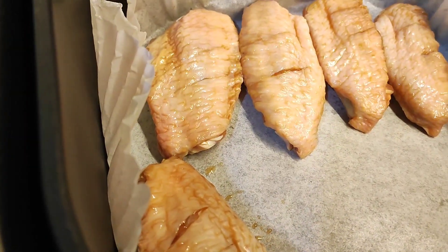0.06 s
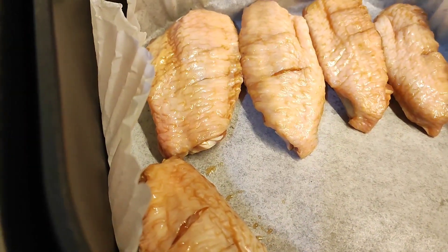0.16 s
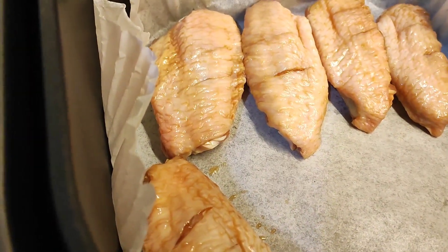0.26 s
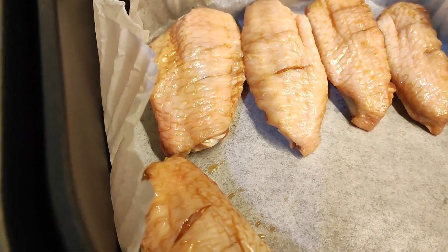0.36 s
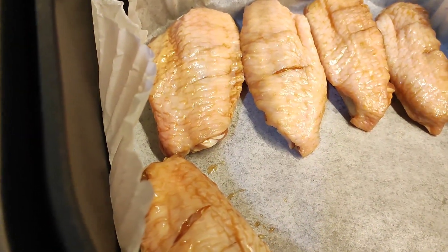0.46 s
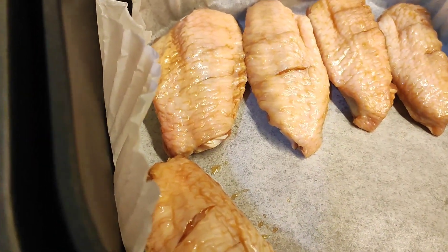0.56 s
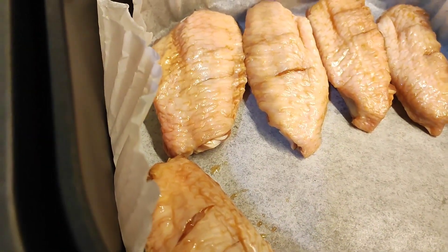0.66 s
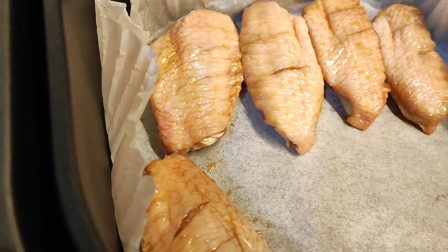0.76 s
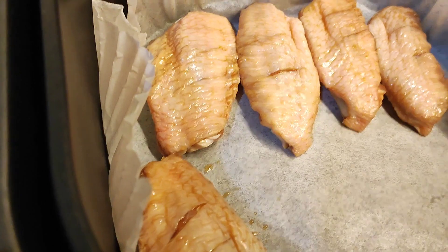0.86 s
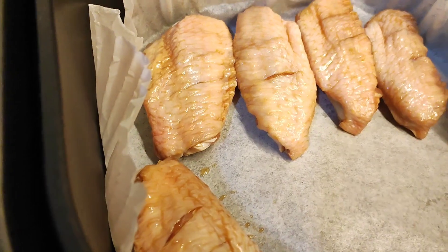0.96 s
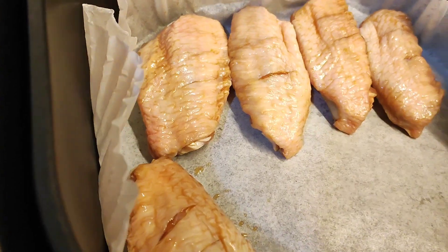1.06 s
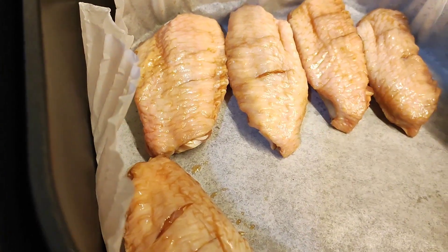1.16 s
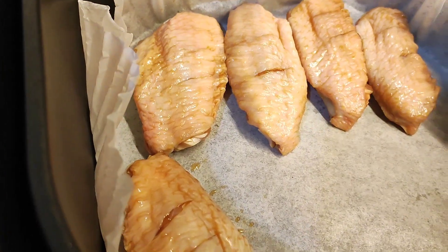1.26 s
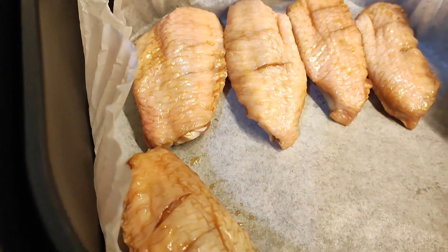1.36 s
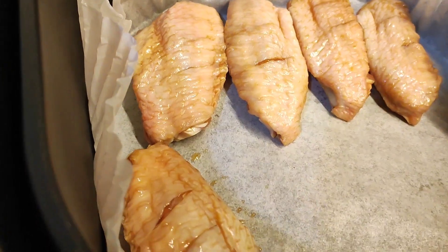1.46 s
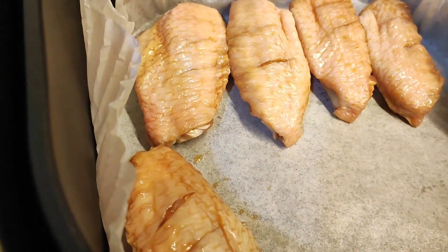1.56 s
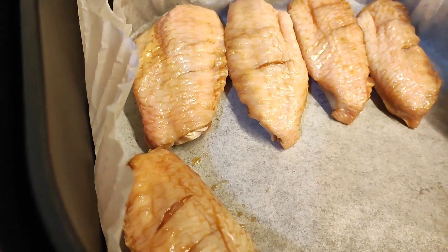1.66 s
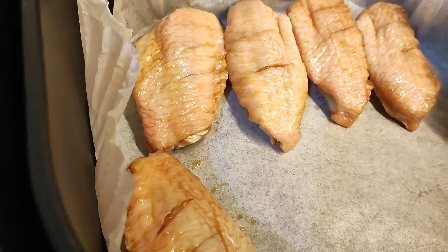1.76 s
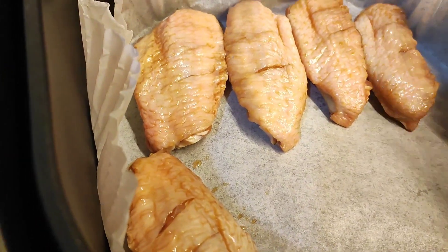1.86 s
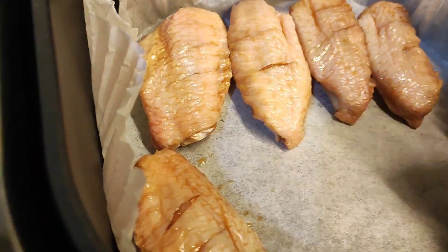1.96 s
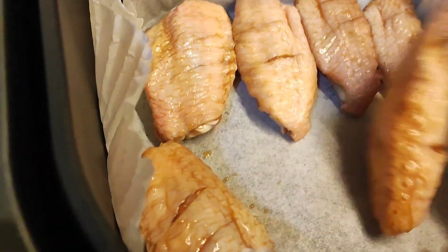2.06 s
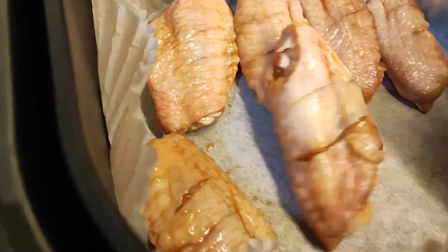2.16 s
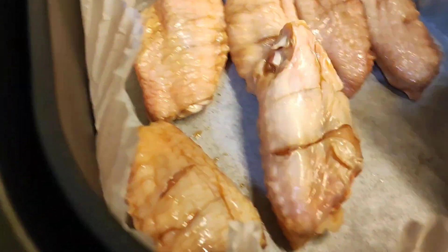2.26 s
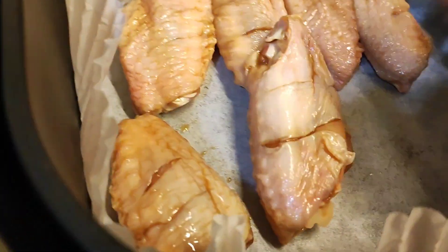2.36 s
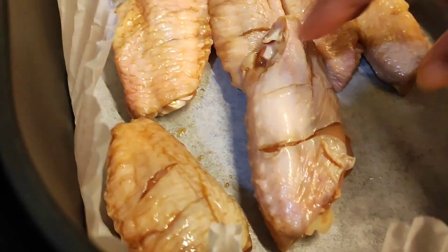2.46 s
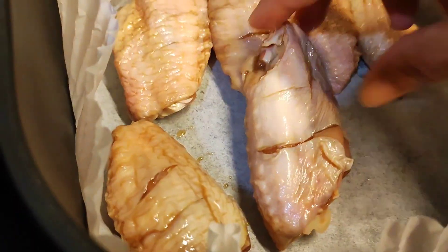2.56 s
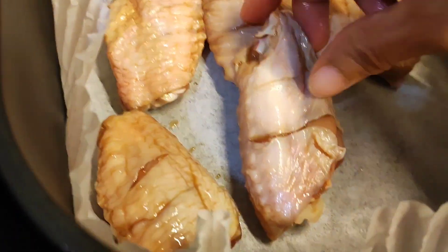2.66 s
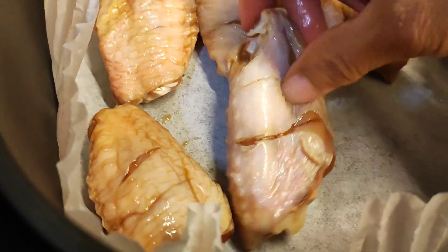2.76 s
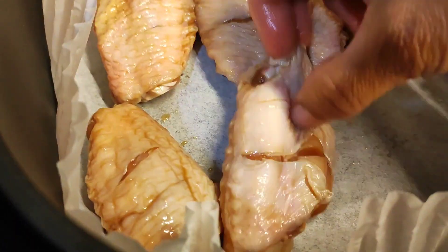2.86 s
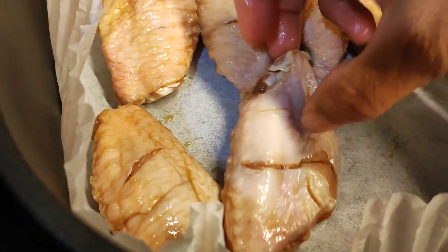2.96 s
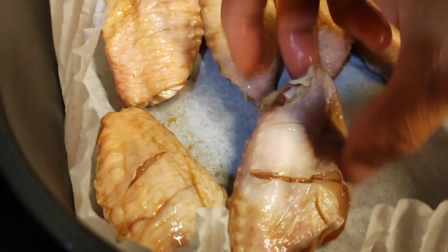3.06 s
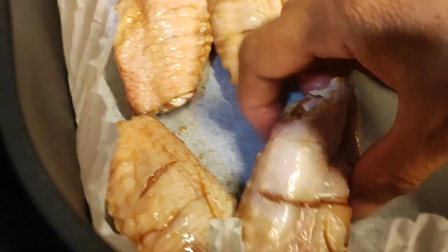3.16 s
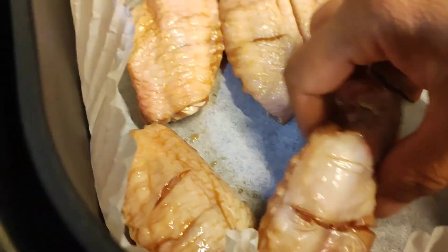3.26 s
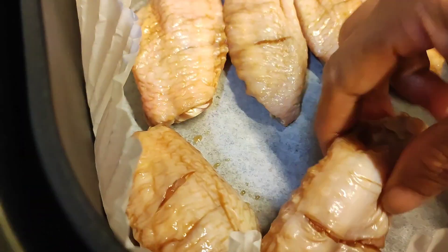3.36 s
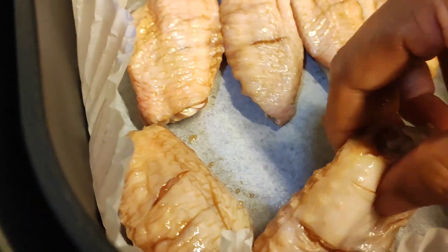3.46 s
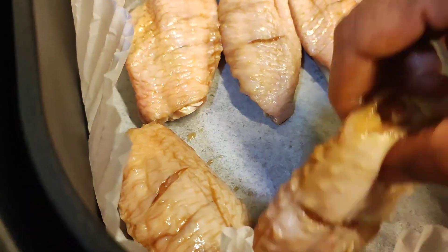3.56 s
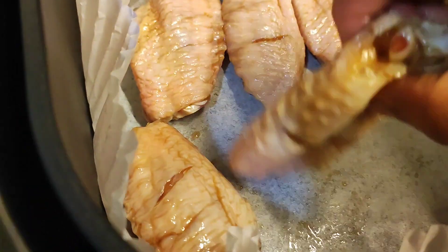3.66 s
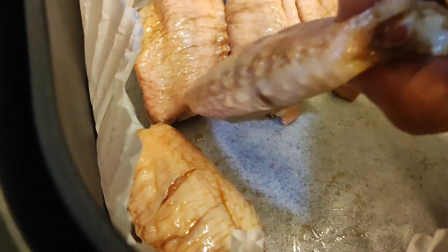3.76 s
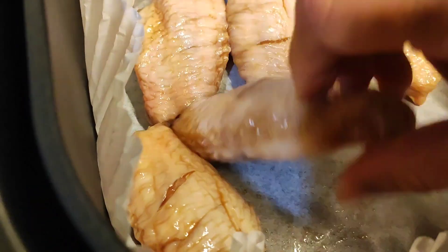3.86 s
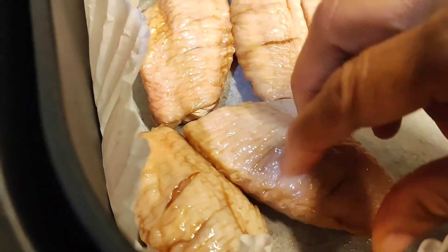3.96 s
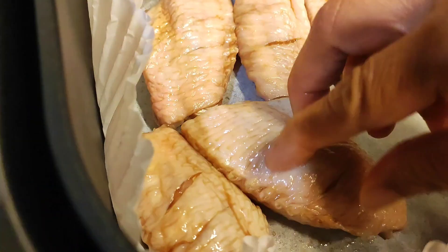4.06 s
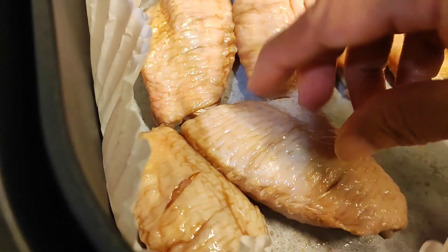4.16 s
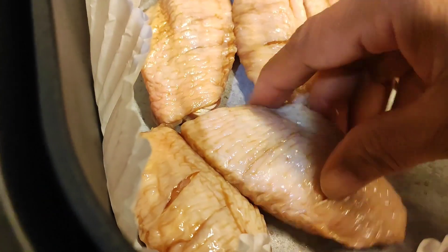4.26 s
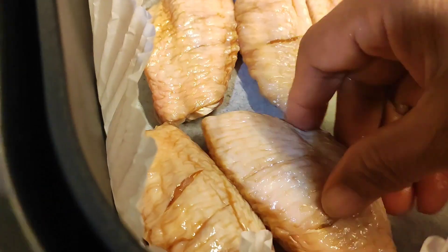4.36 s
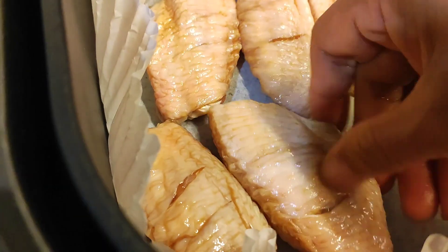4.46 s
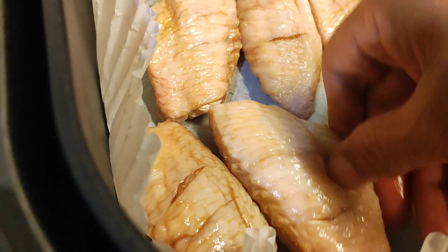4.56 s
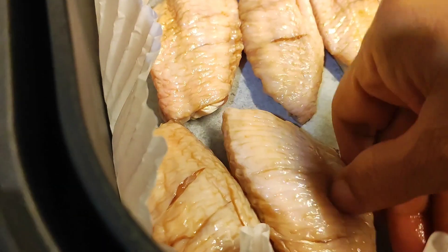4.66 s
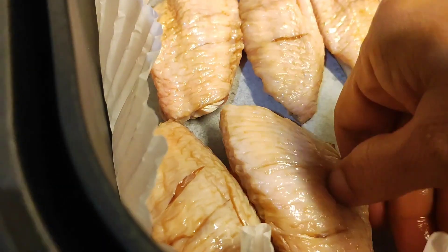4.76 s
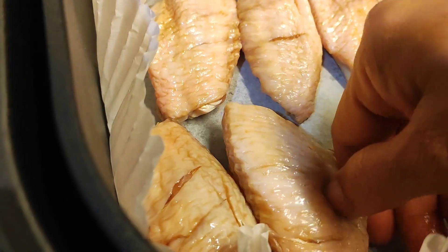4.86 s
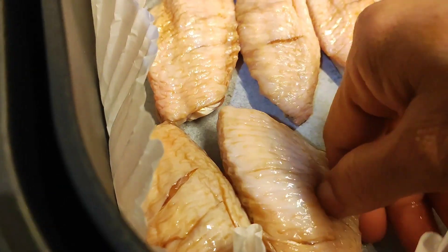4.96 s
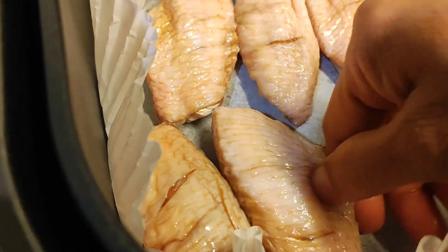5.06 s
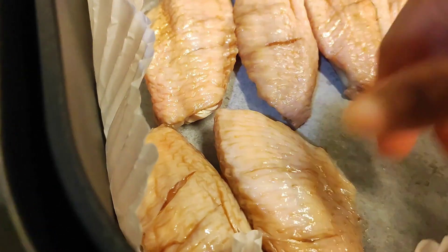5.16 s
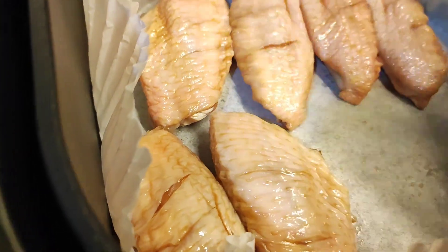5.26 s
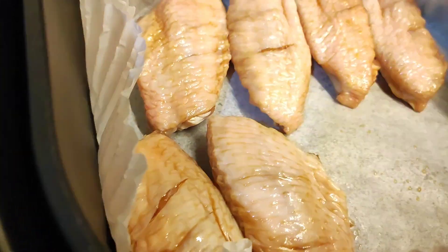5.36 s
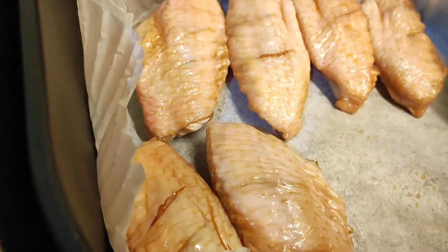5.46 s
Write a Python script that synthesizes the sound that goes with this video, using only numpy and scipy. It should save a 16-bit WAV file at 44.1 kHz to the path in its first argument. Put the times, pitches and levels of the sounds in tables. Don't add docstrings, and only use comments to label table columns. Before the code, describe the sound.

A small kitchen heard close up in stereo, with a very quiet low motor hum, dull rumble and soft hiss throughout. For the first second there are only barely audible high paper ticks. At about 1.1 to 1.3 s a soft touch with a faint wet squeak leads into a rounded, hollow bump as a bowl is set down. A dull woody knock comes at 1.86 s. At 2.07 to 2.25 s wet chicken lands: the loudest moment, a dense spray of sharp paper snaps, leaning right, over a soft low thud. Faint rustle follows. From 3.2 to 3.7 s paper crackles lightly as skin peels away, with a clear little pop at 3.48 s. A second crisp placement with a low thud hits at 3.9 to 4.0 s. Nudges crackle at 4.3, 4.45, 4.7 and 4.85 s, fading to small isolated snaps around 5.1 to 5.2 s.

```python
import sys
import numpy as np
from scipy import signal
from scipy.io import wavfile

SR = 44100
rng = np.random.default_rng(int(sys.argv[2]) if len(sys.argv) > 2 else 0)


def field_ratio(decibels):
    return 10 ** (np.asarray(decibels, dtype=float) / 20)


def master_out(mix):
    frames = np.transpose(np.atleast_2d(mix))
    ceiling = np.clip(frames, -1, 1)
    pcm = np.round(ceiling * 32767).astype(np.int16)
    wavfile.write(sys.argv[1], SR, pcm)


N = 242550


def at_hz(points, hz):
    point_hz, value = np.transpose(points)
    return np.interp(np.log(hz), np.log(point_hz), value)


def rms_one(x):
    return x / np.sqrt(np.mean(x ** 2) + 1e-20)


def band(x, low_hz, high_hz, order=2):
    return signal.sosfilt(signal.butter(order, [low_hz, high_hz], "band", fs=SR, output="sos"), x + 1e-18)


def drift(rate_hz):
    r = np.exp(-80 * np.pi * rate_hz / SR)
    slow = signal.lfilter([1], [1, -2 * r, r * r], rng.standard_normal(N // 40 + 2002))[2000:]
    return np.interp(np.arange(N) / 40, np.arange(len(slow)), rms_one(slow))


def resonance(x, hz, width_hz):
    r = np.exp(-np.pi * width_hz / SR)
    zeros = np.array([1, 0, -1]) * (1 - r * r) / 2
    return signal.lfilter(zeros, [1, -2 * r * np.cos(2 * np.pi * hz / SR), r * r], x)


def dying(t60, rise_s):
    t = np.arange(int(1.2 * t60 * SR) + 2) / SR
    return (1 - np.exp(-t / rise_s)) * field_ratio(-60 * t / t60)


def add(track, s, piece):
    i = round(s * SR)
    track[..., i:i + piece.shape[-1]] += piece[..., :N - i]


PAPER_EDGES_HZ = [450, 800, 3000, 7000, 15000]


def creases(per_s, spread_db, shared, flap_db):
    sizes = field_ratio(spread_db * np.minimum(rng.exponential(1, (3, N)), 3)) * rng.choice([-1, 1], (3, N))
    both, left, right = sizes * (rng.random((3, N)) < per_s / SR)
    at = np.clip(np.arange(N) + rng.integers(-14, 15, N), 0, N - 1)
    clicks = np.array([shared * both + left, shared * np.bincount(at, both, N) + right])
    flap = np.repeat(rng.integers(0, 16, N // 128 + 1), 128)[:N]
    rings = 0
    for k, hz in enumerate(np.geomspace(900, 13000, 16)):
        rings = rings + resonance(clicks * (flap == k) + 1e-18, hz, 0.15 * hz) / np.sqrt(hz)
    sound = rms_one(clicks) + field_ratio(flap_db) * rms_one(rings)
    bands = [rms_one(band(sound, a, b, order=3)) for a, b in zip(PAPER_EDGES_HZ, PAPER_EDGES_HZ[1:])]
    return np.stack(bands, axis=1)


# start in seconds, peak in dB, brightness in dB, t60 in seconds, left over right in dB.
SETTLING_SNAPS = [
    (0.338, -58, -10, 0.069, -6),
    (0.466, -57.5, 10, 0.14, -4),
    (1.019, -75, 25, 0.2, -6),
    (1.125, -32, -11, 0.032, 0),
    (1.245, -44, -35, 0.085, 0),
    (2.455, -53, -4.5, 0.22, -5),
    (2.508, -52, -17, 0.031, -1),
    (2.923, -57.5, -11, .044, -11),
    (2.936, -45.5, -14, 0.053, 3),
    (3.061, -53.5, -19, 0.042, 8.5),
]
DROPPING_SNAPS = [(2.072, -26, 14.5, 0.01, -1.5), (2.079, -26, -0.5, 0.05, 5),
                  (2.092, -11.5, -3, 0.015, -5), (2.096, -15.5, -13, 0.043, -14.5),
                  (2.118, -25.5, -14, 0.072, -3.5), (2.129, -30, -1, 0.047, -10.5),
                  (2.14, -25, 15, 0.043, -4.5), (2.147, -30.5, -3, 0.22, -8.5), (2.225, -28, -4, 0.033, -9),
                  (2.231, -28, -1, 0.046, -9), (2.247, -41.5, -1.5, 0.11, 14), (2.31, -37.5, -24, 0.028, 8),
                  (2.358, -49.5, -36.5, 0.019, 18), (3.91, -25.5, -1.5, 0.022, -1.5),
                  (3.951, -49, -2, 0.028, -6), (3.97, -39.5, 0.5, 0.052, 1), (3.995, -15, -9, .018, 5),
                  (4.001, -20.5, 12, 0.016, 6), (4.008, -31, 11, 0.034, -1), (4.013, -27, -8, 0.056, 1)]
PEELING_SNAPS = [(3.169, -46, -33, 0.072, 3), (3.177, -26, -31, 0.017, -2), (3.1876, -26, 3, 0.017, 8),
                 (3.263, -51, -28, .035, 13), (3.375, -42.5, -40, 0.056, 1.5),
                 (3.4741, -28, -13.5, 0.044, -11), (3.531, -28.5, -2.5, 0.064, -2),
                 (3.545, -35, -8, 0.1, 8.5), (3.5745, -25.5, -6.5, 0.053, 3.5),
                 (3.598, -38.5, -17, 0.0368, 2), (3.628, -32, -5.5, 0.03, 0.5), (3.6428, -33, -6, 0.09, 0),
                 (3.659, -33.5, -1.5, 0.067, 5), (3.688, -35.5, -28.5, 0.067, -3.5),
                 (3.705, -38, -23.5, 0.029, 4)]
NUDGING_SNAPS = [(4.311, -27, -13.5, 0.042, 3), (4.316, -17.5, -6, .029, 3), (4.331, -25.5, 3.5, 0.026, 6),
                 (4.354, -36, -31, 0.032, 12), (4.37, -37, -10, 0.032, 7), (4.437, -45, -22, 0.022, 3),
                 (4.453, -24, -7, 0.098, 2.5), (4.504, -47, 0, 0.082, 3), (4.533, -47, -4.5, 0.099, 1),
                 (4.646, -47, -17, 0.023, 8), (4.657, -41, -13, .043, 4), (4.67, -23.5, -7.5, 0.048, 2),
                 (4.691, -21, -3, 0.04, -3.5), (4.703, -34, -4, 0.13, 5), (4.734, -38, 7, .029, 0),
                 (4.743, -42.5, 16.5, 0.043, -0.5), (4.794, -34.5, 4, .03, 0),
                 (4.844, -27, -10.5, 0.043, 4), (4.975, -44, -30, 0.052, -1), (5.12, -30.5, -4, 0.029, 1.5),
                 (5.163, -38.5, -8, 0.04, -1.5), (5.191, -36.5, -16, 0.024, -2.5),
                 (5.212, -45.5, -27, 0.042, 2)]
# time of the peak in seconds, peak in dB, brightness in dB, swell in seconds, t60 in seconds.
DRAGS = [(1.128, -40.5, -20, 0.0071, 0.19), (1.196, -43, -6.5, 0.004, 0.15), (2.091, -19, 5.5, 0.022, 0.13),
         (2.139, -30.5, 5, 0.056, 0.19), (2.232, -32, -1.5, 0.046, 0.22), (2.313, -43.5, -14, 0.011, 0.21),
         (3.188, -30, -8.5, 0.016, 0.26), (3.277, -41, -9, 0.14, 0.051),
         (3.478, -43.5, -6.5, 0.0053, 0.206), (3.533, -42, 1.5, 0.0032, 0.5),
         (3.651, -35, -7.5, 0.054, 0.13), (3.914, -35.5, -12.5, 0.015, 0.33),
         (4.004, -21, 7, 0.0046, 0.081), (4.04, -44.5, 4, 0.037, 0.37), (4.316, -34, -3.5, 0.011, 0.39),
         (4.44, -44, -20, 0.1, 0.097), (4.689, -42, -1.5, 0.049, 0.55), (4.792, -50.5, -1.5, .002, 0.26),
         (4.845, -44, -10.5, 0.0046, .13), (5.122, -50.5, -1, 0.0045, 0.204), (5.2, -53, -11, 0.11, 0.36)]
# level in dB, share of the brightness [dB per dB].
SNAP_CRISP = (0.2, 0.5)
DRAG_CRISP = (0.12, 0.62)
DRAG_QUICK = [0.77, 0.94, 1.036, .85]


def paper():
    snap_rise_s, crack_db = 0.0003, -7
    swell_db, belly_db = 25.5, -1
    snap, crack, drag = np.zeros((2, 4, N)), np.zeros((2, N)), np.zeros((4, N))
    t = np.arange(SR // 2) / SR
    for s, db, bright_db, t60, pan_db in SETTLING_SNAPS + DROPPING_SNAPS + PEELING_SNAPS + NUDGING_SNAPS:
        sides = field_ratio(np.array([[0.5], [-0.5]]) * pan_db)
        crisp_db = SNAP_CRISP[0] + SNAP_CRISP[1] * bright_db
        for k, (rel_db, quick) in enumerate([(0, 1.01), (crisp_db, 0.85), (bright_db, 0.7)]):
            shape = dying(max(t60, 0.008) * quick, snap_rise_s)
            add(snap[:, k + 1], s, sides * field_ratio(db + rel_db - 7.5) * shape)
            click = band(t[:400] == 0, *PAPER_EDGES_HZ[k + 1:k + 3])
            add(crack, s + snap_rise_s, sides * field_ratio(db + rel_db + crack_db) * click / click.max())
    for s, db, bright_db, swell_s, t60 in DRAGS:
        swell_s = max(swell_s, 0.001)
        crisp_db = DRAG_CRISP[0] + DRAG_CRISP[1] * bright_db
        tone_db = np.array([[belly_db], [0], [crisp_db], [bright_db]])
        climb_db = swell_db * (t / swell_s - 1)
        fade_db = -60 * (t - swell_s) / (max(t60, 0.02) * np.array(DRAG_QUICK)[:, None])
        add(drag, s - swell_s, field_ratio(db - 7 + tone_db + np.minimum(climb_db, fade_db)))
    drag = drag * field_ratio(2.5 * drift(160) - 0.5)
    shower = creases(7000, spread_db=0.5, shared=0.79, flap_db=-11.5)
    return ((snap + drag) * shower).sum(1) + crack


# start in seconds, peak in dB, pitch in Hz, t60 in seconds.
FLAPS = [(2.066, -37, 1010, 0.044), (2.080, -25, 1147, 0.022), (2.09, -25, 3180, .025),
         (2.118, -30, 5660, .02), (2.133, -29, 3150, 0.07), (2.136, -31.5, 1010, 0.095),
         (2.14, -14.5, 4950, .02), (2.146, -24, 4900, .03), (2.231, -31, 4840, .015),
         (2.234, -36, 966, 0.033), (2.3104, -37, 1220, .02), (3.1903, -26.5, 2500, 0.029),
         (3.229, -43, 1200, .03), (3.5335, -33, 3800, .02), (3.574, -39, 3760, .02),
         (3.629, -38, 5500, .015), (3.644, -28.5, 1370, .03), (3.66, -37, 7900, 0.023),
         (3.187, -37.5, 8000, 0.03), (3.9497, -45, 1034, .03), (4.001, -27, 1320, .04),
         (4.003, -29.5, 967, 0.085), (4.003, -20, 2650, 0.031), (4.317, -26, 1420, 0.022),
         (4.329, -29, 7160, 0.012), (4.372, -38, 1496, .02), (4.435, -41, 1380, .04),
         (4.456, -32, 3900, 0.034), (4.6455, -50, 1590, .03), (4.691, -33, 6340, 0.018),
         (4.703, -36, 1290, 0.043), (4.717, -41, 1310, .05), (4.7439, -33, 3800, 0.022),
         (4.7935, -35.5, 2490, 0.029), (4.8445, -30.5, 3660, 0.017), (5.117, -33.5, 3700, 0.028),
         (5.163, -38.5, 1230, 0.024), (5.192, -46, 1285, 0.018)]


def flaps():
    out = np.zeros((2, N))
    noise = rng.standard_normal((len(FLAPS), 3, 6000))
    for (s, db, hz, t60), (both, left, right) in zip(FLAPS, noise):
        shape = dying(np.clip(t60, 0.008, 0.1), rise_s=0.0006)
        width_hz = 0.079 * hz
        ring = resonance(both + 0.6 * np.array([left, right]), hz, width_hz)
        ring = resonance(ring, hz, width_hz)
        add(out, s, field_ratio(db + 0.5) * rms_one(ring)[:, 500:500 + len(shape)] * shape)
    return out


# start in seconds, peak in dB, pitch in Hz.
TICKS = [
    (0.2976, -54, 12900),
    (0.3386, -51, 11600),
    (0.4666, -65, 10900),
    (0.479, -50, 8600),
    (0.5467, -56, 13600),
    (0.6624, -61, 9100),
    (0.6983, -56.5, 13200),
    (1.02, -44.5, 9200),
    (1.954, -49, 9600),
    (2.553, -55, 6630),
]


def ticks():
    out = np.zeros(N)
    noise = rng.standard_normal((len(TICKS), 2000))
    for (s, db, hz), row in zip(TICKS, noise):
        shape = dying(0.029, rise_s=0.0016)[:2000]
        burst = rms_one(resonance(row, hz, 3500))[:len(shape)]
        add(out, s, field_ratio(db - 3.5) * burst * shape)
    return out


# start in seconds, peak in dB, pitch in Hz, t60 in seconds, deep push in dB re peak.
THUDS = [(1.133, -34, 410, 0.041, -6), (1.15, -34.5, 400, 0.042, -3), (1.181, -33, 430, 0.043, -17),
         (1.238, -28.5, 437, 0.038, -19), (1.267, -43, 150, 0.049, -7.5), (1.858, -22, 770, 0.081, -21.5),
         (1.877, -31.5, 734, 0.036, -17), (2.091, -17, 542, 0.12, -17), (2.101, -12.5, 454, 0.028, -1.5),
         (2.117, -21.5, 430, 0.12, -16), (2.14, -27, 420, 0.06, -14.5), (3.192, -35, 535, 0.13, -28.5),
         (3.232, -37.5, 452, 0.23, -11), (3.27, -36.5, 457, 0.044, -18), (3.529, -34.5, 567, 0.092, -34),
         (3.645, -33.5, 562, 0.084, -21), (3.789, -42.5, 154, 0.089, -2), (3.907, -34.5, 420, 0.057, -35),
         (4.007, -19.5, 217, 0.04, -8.5), (4.313, -33, 437, 0.093, -33.5), (4.451, -32, 483, 0.08, -21.5),
         (4.691, -41.5, 393, 0.27, -24.5)]
# pitch in Hz, level in dB, t60 in seconds.
BASKET_FLOOR = [(157, -16, 0.21), (214, -4, 0.18), (260, -22.5, 0.083), (275, 0.5, 0.13), (350, -8, 0.41),
                (425, -4.5, 0.15), (515, -5.5, 0.27), (568.7, -20, 0.09)]


def thuds():
    out = np.zeros(N)
    noise = rng.standard_normal((len(THUDS), 12000))
    strike_db = rng.normal(0, 3, (len(THUDS), 16))
    t = np.arange(12000) / SR
    push = sum(a * np.sin(2 * np.pi * hz * t) for hz, a in [(170, 1), (135, 0.16), (95, 0.43)])
    for (s, db, hz, t60, push_db), row, grip_db in zip(THUDS, noise, strike_db):
        shape = dying(np.clip(t60, 0.02, 0.2), rise_s=0.0043)
        floor = 0
        for (mode_hz, level_db, ring_s), g in zip(BASKET_FLOOR, grip_db):
            floor = floor + field_ratio(level_db + g - 60 * t / ring_s) * np.sin(2 * np.pi * mode_hz * t)
        spot = rms_one(resonance(row, hz, 150))
        body = field_ratio(-11.0) * floor + field_ratio(-3.5) * spot + field_ratio(push_db) * push
        add(out, s, field_ratio(db + 4.0) * body[:len(shape)] * shape)
    return band(out, 80, 640, order=4)


# start in seconds, peak in dB, pitch in Hz, t60 in seconds, rise in seconds.
POPS = [
    (1.134, -38, 1095, 0.036, 0.01),
    (1.155, -43, 1112, 0.052, 0.0072),
    (1.255, -53, 1080, 0.053, .004),
    (1.274, -51, 1105, 0.063, 0.0095),
    (3.475, -21, 1350, 0.0099, 0.0011),
    (3.479, -28.5, 1296, 0.011, 0.0011),
    (3.911, -38.5, 523, 0.094, 0.0013),
    (4.669, -49, 1070, 0.0206, 0.00093),
    (4.692, -42, 1420, 0.033, 0.00085),
]


def pops():
    out = np.zeros(N)
    waver = np.cumsum(1 + 0.008 * drift(60)) / SR
    for s, db, hz, t60, rise_s in POPS:
        shape = dying(t60, max(rise_s, 1e-4))
        turns = hz * waver[round(s * SR):][:len(shape)]
        add(out, s, field_ratio(db + 9.0) * shape * np.sin(2 * np.pi * (turns - turns[0])))
    return out


# pitch in Hz, peak in dB, t60 in seconds.
BOWL = [(78, -31.5, 0.2), (175, -31, 0.16), (233, -23, 0.15), (300, -26, 0.079), (343.5, -16.5, 0.074),
        (421, -19, 0.048), (481, -18.5, 0.08), (548, -25, 0.047), (876, -30.5, 0.061), (696, -34, 0.047)]


def bowl():
    out, t = np.zeros(N), np.arange(SR // 2) / SR
    modes = sum(field_ratio(db - 60 * t / t60) * np.sin(2 * np.pi * hz * t) for hz, db, t60 in BOWL)
    add(out, 1.1915, modes * (1 - np.exp(-t / 0.0022)) ** 2)
    return out


# start in seconds, peak in dB, low edge in Hz, high edge in Hz, t60 in seconds.
KNOCKS = [
    (.237, -59.5, 3500, 5400, .2),
    (.325, -60, 4200, 5500, .15),
    (.365, -59, 4000, 5300, .15),
    (1.71, -58, 1300, 2200, .2),
    (1.855, -24, 700, 2000, .05),
    (1.8555, -46, 2000, 5000, .04),
    (1.861, -28, 450, 1100, .09),
    (1.875, -36, 400, 1900, .17),
    (4.975, -59, 3600, 4700, .26),
]


def knocks():
    out = np.zeros(N)
    noise = rng.standard_normal((len(KNOCKS), 14000))
    for (s, db, low_hz, high_hz, t60), row in zip(KNOCKS, noise):
        shape = dying(t60, rise_s=0.00043)
        burst = rms_one(band(row, low_hz, high_hz))[:len(shape)] * shape
        add(out, s, field_ratio(db - 7) * band(burst, low_hz / 2, high_hz))
    return out


# pitch in Hz, width in Hz, level in dB.
BASKET_AIR = [(1177, 200, -1.5), (1426, 49, 2.5), (2298, 510, -8.5), (3900, 1300, 0)]


def basket(x):
    lifted = sum(field_ratio(db) * resonance(x, hz, width_hz) for hz, width_hz, db in BASKET_AIR)
    return field_ratio(-2) * (x + lifted)


def kitchen(x):
    dull_t60_s, bright_t60_s, split_hz = 0.34, 0.21, 1300
    t = np.arange(SR // 2) / SR
    onset = np.clip((t - 0.004) / 0.029, 0, 1)
    white = rng.standard_normal((2, 2, len(t))) * onset
    dull = band(white[0], 60, split_hz, order=1) * field_ratio(-60 * t / dull_t60_s)
    bright = band(white[1], split_hz, 15000, order=1) * field_ratio(-60 * t / bright_t60_s - 9.5)
    echoes = dull + bright
    echoes = echoes / np.sqrt((echoes ** 2).sum(1, keepdims=True))
    return signal.fftconvolve(x[None], echoes, axes=1)[:, :N]


def hum():
    turns = np.cumsum(100 + 3.5 * drift(8.9)) / SR
    tone = np.sqrt(2) * np.sin(2 * np.pi * turns)
    return field_ratio(-54.5 + 2.2 * drift(14)) * tone * field_ratio(np.array([[-0.8], [0.8]]))


# frequency in Hz, likeness from -1 to 1.
LIKENESS = [(60, 0.66), (180, 0.81), (550, 0.46), (1650, -0.076), (4970, -0.65), (15000, -0.81)]


def air(spectrum, level_db, first_hz, count, patchy_db):
    out, edges = 0, first_hz * 2 ** (np.arange(count) / 3)
    white = rng.standard_normal((2, 2, N + 8000))
    for k, (low, high) in enumerate(zip(edges, edges[1:])):
        mid, side = band(white[k % 2], low, high, order=3)[:, 8000:]
        hz = np.sqrt(low * high)
        alike = np.clip(at_hz(LIKENESS, hz), -1, 1)
        gain = field_ratio(at_hz(spectrum, hz) + patchy_db * drift(9.4))
        out = out + gain * (np.sqrt(1 + alike) * mid + np.sqrt(1 - alike) * side * [[1], [-1]])
    return field_ratio(level_db) * rms_one(out)


# frequency in Hz, level in dB per Hz.
RUMBLE = [(22, 0), (30, -11), (45, -10.5), (75, -1.5), (110, -2), (140, -12.5), (250, -8), (370, -6.5),
          (420, 0.5), (480, -17), (560, -18), (900, -24)]


def rumble():
    return air(RUMBLE, -54, 21.27, count=16, patchy_db=1.5)


# frequency in Hz, level in dB per Hz.
HISS = [(350, -29), (600, 1), (669, -8), (720, -8.5), (988, -8), (1190, -9), (1550, -10.5), (1690, -12.5),
        (3140, -13.5), (7270, -25), (10500, -24.5), (14300, -63), (22000, -120)]


def hiss():
    after_s = np.maximum(np.arange(N) / SR - 2.2, 0)
    lift_db = 7 * (1 - np.exp(-after_s / 0.4))
    middle = field_ratio(0.25 * lift_db) * air(HISS, -67.2, 716, count=14, patchy_db=2.8)
    top = rms_one(band(rng.standard_normal((2, N)), 11000, 14700))
    return middle + field_ratio(-81 + lift_db) * top


def scene():
    contacts = thuds() + pops() + bowl() + knocks()
    near = basket(paper() + ticks()) + contacts * field_ratio(np.array([[-2.2], [2.2]]))
    echo = field_ratio(-19) * kitchen(near.mean(0))
    return near + flaps() + echo + hum() + rumble() + hiss()


def band_limit(x):
    return signal.sosfilt(signal.butter(12, 15700, fs=SR, output="sos"), x)


def record(dry):
    cut = signal.sosfilt(signal.cheby2(10, 30, 14600, fs=SR, output="sos"), dry)
    return band_limit(cut)


dry = scene()
out = record(dry)
master_out(out)
```